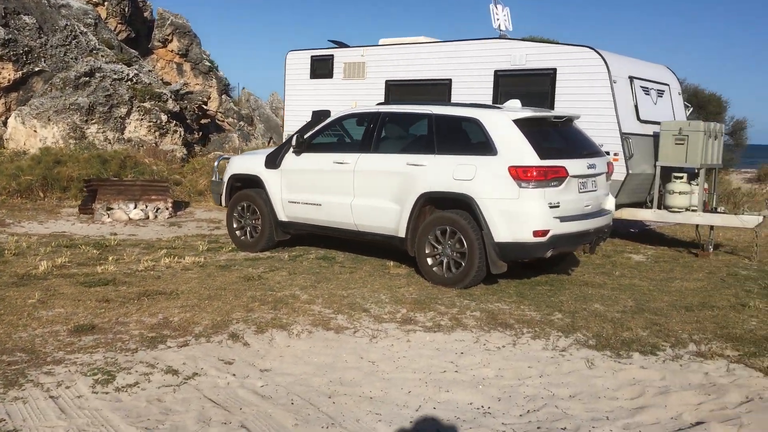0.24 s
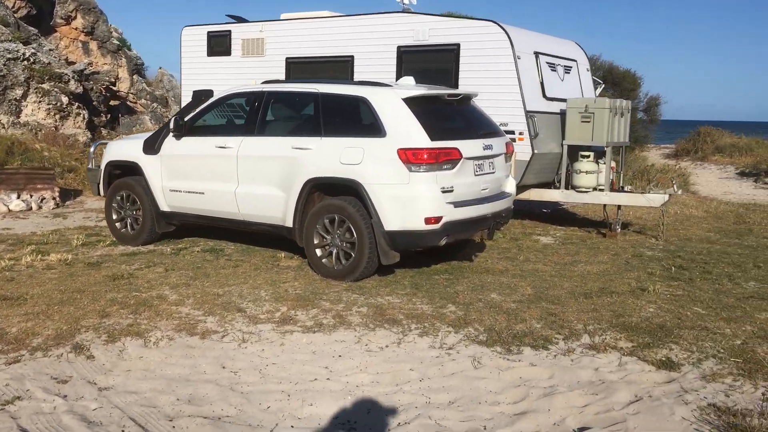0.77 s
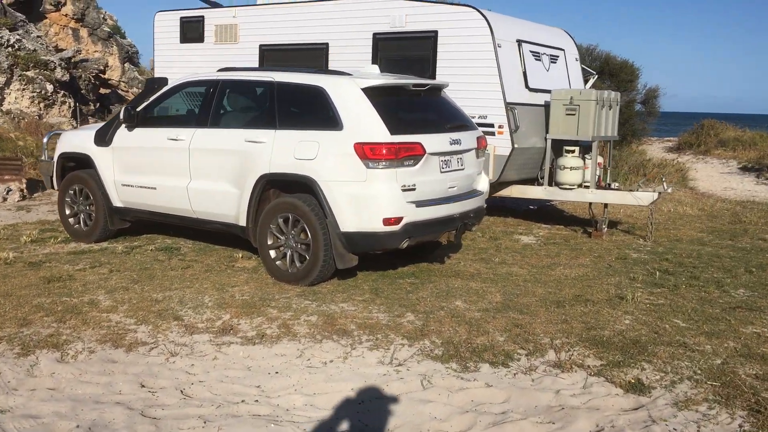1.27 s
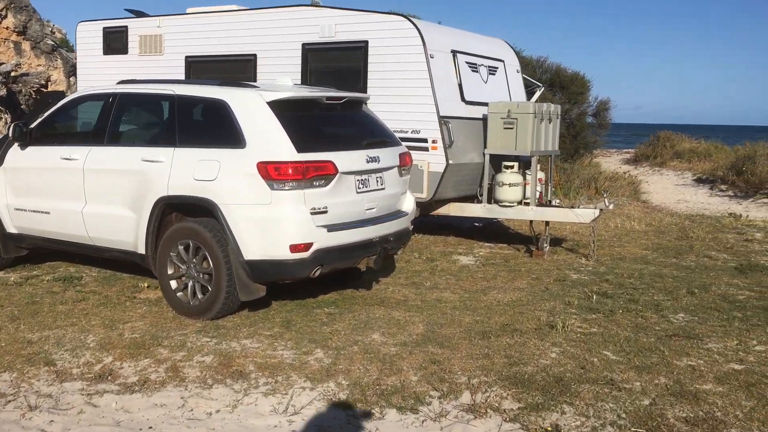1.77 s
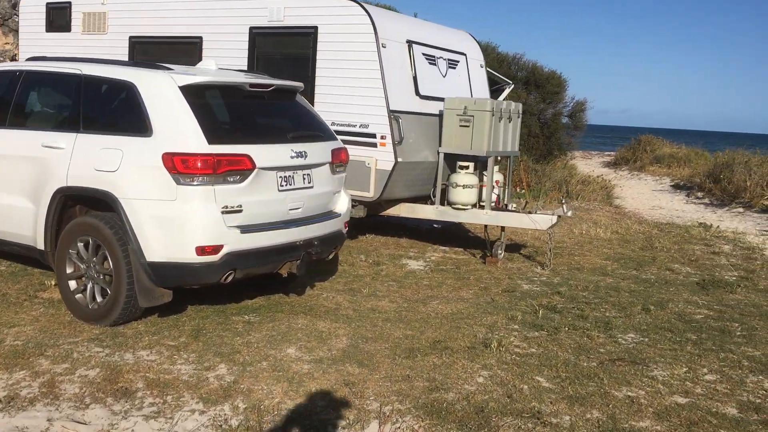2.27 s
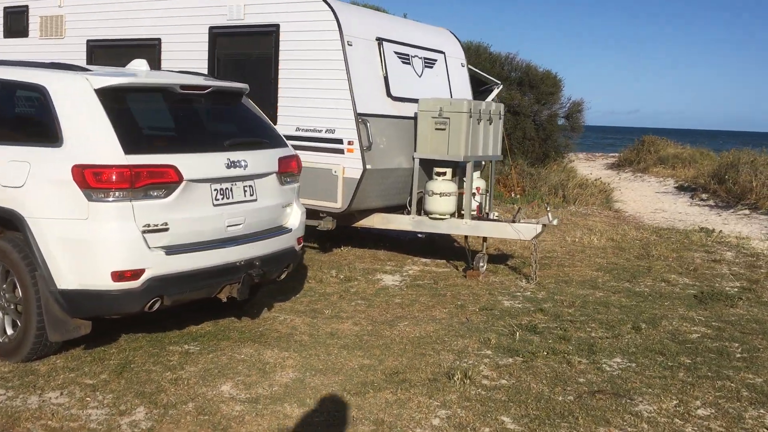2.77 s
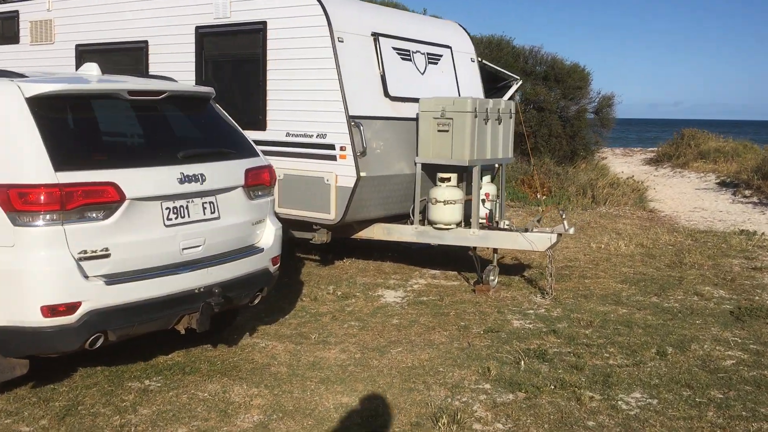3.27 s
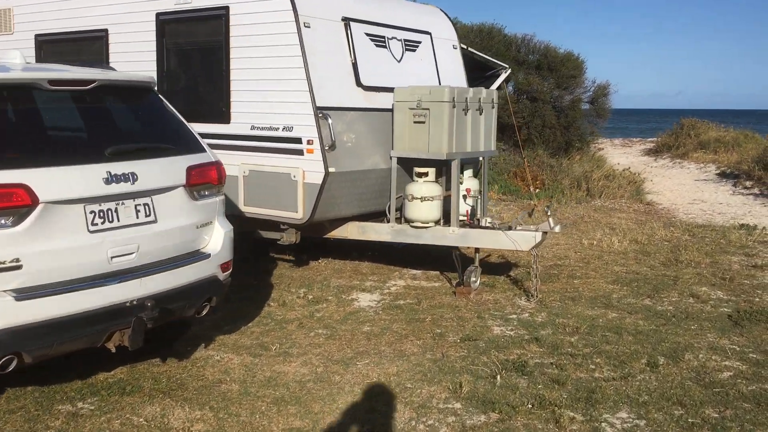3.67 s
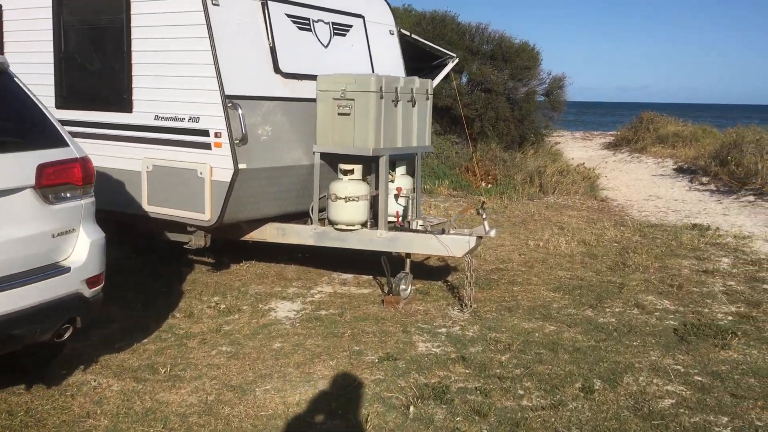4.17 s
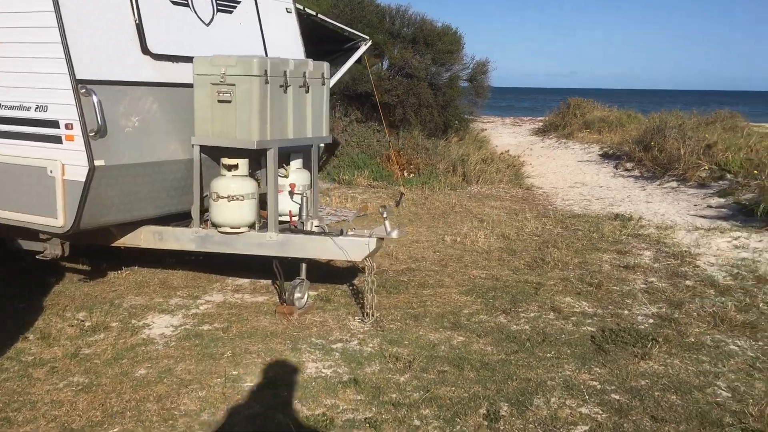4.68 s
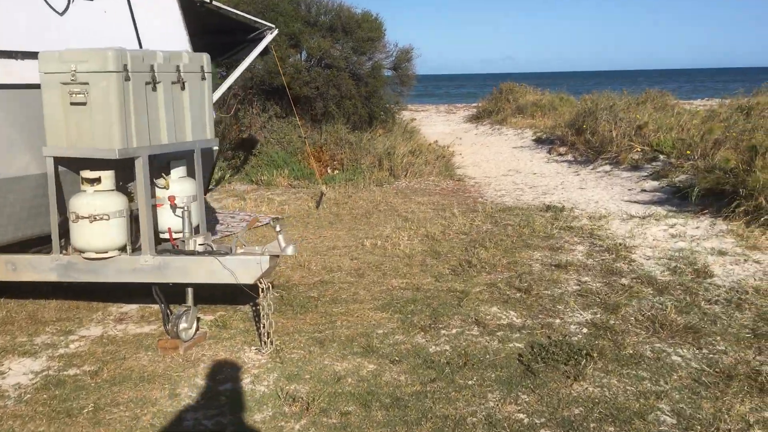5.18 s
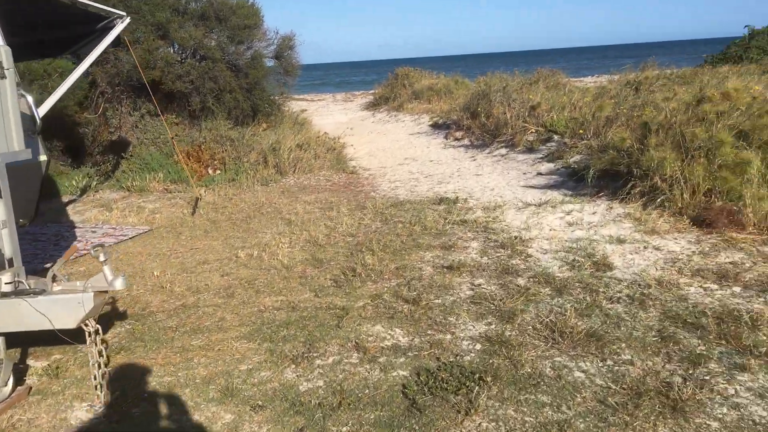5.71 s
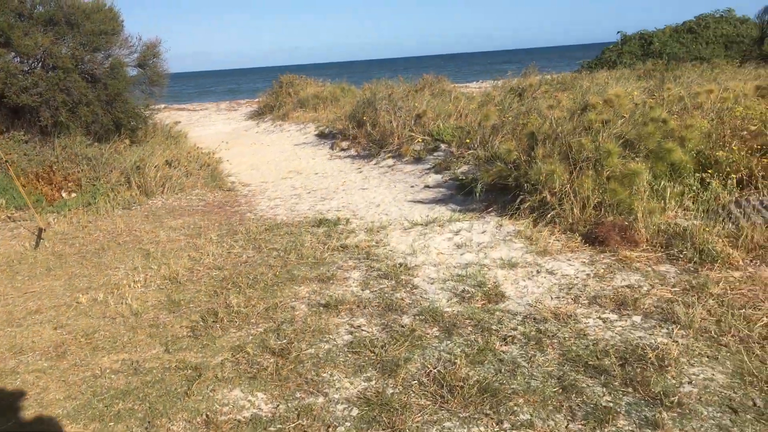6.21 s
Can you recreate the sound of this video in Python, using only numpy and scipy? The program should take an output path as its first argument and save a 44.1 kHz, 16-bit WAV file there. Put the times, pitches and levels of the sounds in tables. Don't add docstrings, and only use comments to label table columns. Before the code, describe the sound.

Strong low gusts buffet a handheld microphone outdoors, fading gradually to reveal small scuffs, grassy crunches and snapping stalks over distant sea wash.

```python
import sys
import numpy as np
from scipy import signal
from scipy.io import wavfile
from scipy.ndimage import uniform_filter1d

SR = 44100
rng = np.random.default_rng(int(sys.argv[2]) if len(sys.argv) > 2 else 0)


def convert_level_to_amplitude(level_db):
    exponent = np.asarray(level_db, float) / 20
    return 10 ** exponent


def pcm_store(signal):
    levels = np.round(np.clip(np.atleast_2d(signal), -1, 1) * 32767)
    wavfile.write(sys.argv[1], SR, levels.astype(np.int16).T)


N = 284445
T = np.arange(N) / SR
COARSE = 32

# time in seconds, roar in dB.
SURF_SWELL = [(0.0, -72.5), (0.21, -71.5), (0.45, -69), (0.6, -69.5), (0.8, -70), (1.36, -69), (1.98, -66),
              (2.91, -63), (3.27, -63), (3.86, -72.5), (4.02, -74.5), (4.89, -71), (6.29, -73),
              (6.45, -68.5)]
# frequency in Hz, density in dB per Hz.
ROAR_SPECTRUM = [(150, -0.5), (300, 1), (400, -2.5), (520, -2), (700, 0), (1000, 1), (1700, -2),
                 (2700, -14.5), (5000, -30.5), (9000, -53)]
# frequency in Hz, density in dB per Hz.
HISS_SPECTRUM = [(900, -6.5), (2000, -6), (4000, 5), (6000, -2.5), (9000, -11), (10500, -7), (12000, -16.5),
                 (15800, -32.5)]
HISS_DB, HISS_FOLLOWS = -78, 0.67

# start pitch in Hz, end pitch in Hz, level in dB.
BIRD_CHIRP = (5300, 6350, -72)
# centre in Hz, width in Hz, level in dB.
INSECT_BUZZ = (4600, 1500, -76)
CHIRP_S, BUZZ_S = (1.345, 1.375), (.11, .35)

# time in seconds, rumble in dB.
BREEZE_RUMBLE = [(0.0, -54), (0.45, -47), (0.53, -49.5), (1.22, -57.5), (1.42, -60.5), (1.6, -49.5),
                 (2.08, -55), (2.19, -65.5), (2.27, -49.5), (2.41, -59), (3.75, -56.5), (4.04, -63),
                 (4.54, -66), (4.92, -73), (5.0, -63), (5.55, -63), (5.85, -57), (6.45, -59)]
# full strength at seconds, hold in seconds, rumble in dB,
# flutter relative to it in dB.
GUSTS = [(0.002, 0.0044, -39, -23), (0.095, 0.0063, -32, -21), (0.181, 0.0083, -35, -10.5),
         (0.238, .17, -41, -1.5), (0.664, 0.027, -40, -6.5), (0.724, 0.12, -43, -20),
         (0.933, 0.044, -37, -26), (1.075, 0.07, -39, -36), (1.15, 0.017, -40.5, -7.5),
         (1.53, 0.021, -42.5, -15), (1.597, 0.053, -39.5, -39), (1.685, 0.093, -40.5, -8),
         (1.886, 0.015, -41.5, -52), (2.306, 0.01, -44, -9.5), (2.506, 0.065, -45.5, -27),
         (2.698, 0.11, -47.5, -17), (3.031, 0.087, -42.5, -9), (3.176, 0.015, -44.5, -24),
         (3.29, .02, -43.5, -23), (3.408, 0.011, -43, -26), (3.544, 0.018, -41.5, -32),
         (3.586, 0.046, -43.5, -17.5), (3.903, 0.074, -50.5, -20), (4.178, 0.16, -55.5, -37),
         (4.334, 0.016, -47.5, -2), (4.366, .11, -50, -17.5), (4.64, 0.038, -51, -19),
         (5.617, 0.13, -57, -38), (6.065, 0.026, -56, -8.5), (6.39, 0.048, -52, -22)]
# start in seconds, peak in dB, pitch in Hz,
# sharp puff relative to it in dB.
PRESSURE_BUMPS = [(0.073, -18, 64.6, -33), (0.186, -28, 141, -24), (0.271, -29, 158, -25),
                  (0.367, -28, 87, -22), (0.669, -25.5, 87.5, -46), (0.81, -32.5, 93, -26),
                  (0.922, -31.5, 58, -30), (1.161, -30, 61.9, -23.5), (1.512, -28.5, 56.6, -35.5),
                  (1.696, -30, 112, -23), (2.3, -34, 116, -52), (2.926, -36.5, 72, -33),
                  (3.041, -29, 55.7, -34), (3.28, -25.5, 81.5, -33), (3.496, -34, 80, -48),
                  (4.319, -40.5, 96, -13.5), (4.336, -36.5, 218, -17.5), (4.584, -41.5, 66, -32),
                  (4.621, -38, 57, -32), (4.962, -49, 61, -24), (5.755, -39, 65, -41),
                  (6.165, -43, 79.5, -23), (6.26, -43, 69, -31)]
GUST_RISE_DB_PER_S, GUST_FALL_DB_PER_S = 332, 265
BREEZE_BUFFET_DB, BREEZE_FLUTTER_DB = -7.5, -11
GUST_BUFFET_DB, BUFFET_FOLLOWS = -4, 0.1

# start in seconds, peak in dB, pitch in Hz, bright tick relative in dB,
# upper ring relative in dB.
STALK_SNAPS = [(0.471, -50, 2020, -31, -20), (0.8964, -48, 2630, -18, -21), (1.0616, -39, 2400, -30, -40),
               (1.3468, -51, 2230, -20, -22), (1.6316, -47.5, 1860, -30, -9.5),
               (2.4444, -33, 2090, -24, -16), (2.7422, -53, 1870, -24, -23), (2.9891, -56, 2260, -15, -10),
               (3.2799, -41, 2950, -30, -33), (3.5253, -47, 1990, -29, -11), (3.8112, -42, 2130, -32, -39),
               (4.3745, -49, 2220, -25, -27), (4.7805, -45, 1830, -28, -11),
               (4.9209, -42, 2150, -31, -12.5), (5.1657, -65, 1800, -24, -18),
               (5.4745, -55, 1860, -18, -18.5), (5.5002, -39.5, 2050, -35, -29),
               (5.515, -45.5, 1960, -20.5, -20), (5.851, -52, 3400, -19, -4), (5.883, -53.5, 3390, -20, -4),
               (6.0506, -42.5, 1990, -33.5, -28), (6.1422, -51, 1850, -29, -23),
               (6.243, -55, 2290, -8, -16), (6.291, -51, 2140, -15, -20)]
# start in seconds, peak in dB, pitch in Hz, length in seconds.
CRUSHED_CLODS = [
    (3.61, -58, 2840, 0.047),
    (4.237, -54, 2200, 0.027),
    (4.279, -55.5, 2050, 0.027),
    (4.619, -51.5, 2300, 0.035),
    (4.745, -59, 2300, .02),
    (4.826, -55, 2310, 0.022),
    (5.715, -43.5, 2100, 0.034),
    (5.746, -44, 2170, 0.036),
    (5.785, -50, 2750, 0.038),
]
# full strength at seconds, hold in seconds, spray in dB,
# crunch relative to it in dB, seconds to fade 20 dB (zero or less: at once).
SAND_CONTACTS = [(0.272, 0.078, -77, 6.5, 0), (0.37, 0.02, -78.5, 8, -0.39), (0.888, .02, -75.5, 3, .08),
                 (0.956, 0.022, -82, 4, 0.1), (1.418, .008, -82, 4, 0.2), (1.483, 0.083, -78.5, 8.5, 0.1),
                 (1.834, .01, -81, -1, 0.2), (2.016, .04, -74.5, 1, 0.23), (2.435, 0.019, -76, 5.5, .1),
                 (2.618, 0.039, -74, 5.5, -1.1), (2.96, .008, -73, -4, 0.65), (2.992, 0.011, -69, 6, -0.12),
                 (3.029, 0.011, -59.5, 8, -0.0059), (3.039, 0.044, -51.5, -0.5, -0.0352),
                 (3.104, 0.026, -83, -2, 1.8)]
GRASS_CONTACTS = [(3.612, 0.0091, -73.5, 6, 0.35), (3.7, 0.029, -80, 11, -0.4),
                  (3.972, .015, -78.5, 3, 0.6), (4.017, 0.0069, -71.5, 3, 0.07),
                  (4.094, 0.038, -81, 6, 0.8), (4.217, 0.031, -72, 5, 0.13),
                  (4.614, 0.0051, -74.5, 7, 0.47), (4.653, .05, -77, 10.5, -0.5), (4.74, 0.04, -73, 9, 0.2),
                  (4.816, 0.036, -76.5, 10, -0.27), (5.101, .01, -77.5, 3.5, 0),
                  (5.337, .055, -72.5, 6, 0.1), (5.703, 0.026, -74, 0, 0.46),
                  (5.772, 0.0048, -70.5, 11, 0.04), (5.794, .03, -68.5, 2, .12),
                  (5.877, 0.07, -75, 8.5, .13), (6.039, 0.095, -82.5, 14, -0.04),
                  (6.26, .02, -73, 5.5, -0.1), (6.29, 0.0083, -77, 10, -4.5),
                  (6.361, 0.033, -59.5, 3.5, .035), (6.414, .03, -76, -5, -2)]
STEP_RISE_DB_PER_S, STEP_SAG_DB_PER_S = 621, 55
CRUNCH_LINGERS = 1.2
CRUNCH_HZ, CRUNCH_HZ_PER_DB = 2050, 17

# centre in Hz, width in Hz, depth from 0 to 1.
BODY_NOTCH = (4890, 1350, 0.53)
# centre in Hz, width in Hz, depth from 0 to 1.
UPPER_NOTCH = (10280, 1500, 0.38)
# centre in Hz, width in Hz, boost as a fraction.
PORT_RESONANCE = (8860, 1600, 0.67)
MIC_HISS_DB = -91.5


def rms_one(x):
    return x / np.sqrt(np.mean(x ** 2) + 1e-20)


def in_time(rows):
    s, *columns = np.transpose(rows)
    return [np.interp(T, s, c) for c in columns]


def drift(rate):
    r = np.exp(-40 * np.pi * rate / SR)
    noise = rng.standard_normal(N // 20 + 2002)
    slow = signal.lfilter([1], [1, -2 * r, r * r], noise)[2000:]
    return np.interp(np.arange(N) / 20, np.arange(len(slow)), rms_one(slow))


def band(x, low_hz, high_hz, order=2):
    edges_hz = [low_hz, min(high_hz, .45 * SR)]
    return signal.sosfilt(signal.butter(order, edges_hz, "band", fs=SR, output="sos"), x)


def resonance(x, hz, width_hz):
    r = np.exp(-np.pi * width_hz / SR)
    zeros = np.array([1, 0, -1]) * (1 - r * r) / 2
    return signal.lfilter(zeros, [1, -2 * r * np.cos(2 * np.pi * hz / SR), r * r], x)


def steep(x, hz, width_hz):
    return resonance(resonance(x, hz, width_hz), hz, width_hz)


def grains(per_s, spread_db):
    draw = rng.random((2, N))
    out, born = np.zeros(N), np.flatnonzero(draw[0] < per_s / SR)
    chance = 2 * draw[1, born] - 1
    size = np.minimum(-np.log(np.abs(chance) + 1e-9), 4)
    out[born] = np.sign(chance) * convert_level_to_amplitude(spread_db * size)
    return rms_one(out)


def envelope_db(s, hold, peak_db, rise_db_per_s, fall_db_per_s, sag_db_per_s=0):
    t = T[::COARSE] - s
    rise = rise_db_per_s * np.clip(-t, 0, 1)
    sag = sag_db_per_s * np.clip(t, 0, hold)
    return peak_db - rise - sag - fall_db_per_s * np.clip(t - hold, 0, 1)


def rounded(coarse_db):
    return np.interp(T, T[::COARSE], uniform_filter1d(coarse_db, size=11))


def banded_noise(spectrum, patchy_db):
    out, edges = 0, 125 * 2 ** np.arange(0, 7.1, 1 / 3)
    white = rng.standard_normal((2, N))
    hz, level_db = np.transpose(spectrum)
    for k, (low, high) in enumerate(zip(edges, edges[1:])):
        centre_db = np.interp(np.log(low * high) / 2, np.log(hz), level_db)
        out = out + convert_level_to_amplitude(centre_db + patchy_db * drift(8.9)) * band(white[k % 2], low, high)
    return rms_one(out)


def surf():
    roar_db, = in_time(SURF_SWELL)
    hiss_db = HISS_DB + HISS_FOLLOWS * (roar_db + 69)
    roar = convert_level_to_amplitude(roar_db + 1.0) * banded_noise(ROAR_SPECTRUM, patchy_db=1.5)
    return roar + convert_level_to_amplitude(hiss_db + 1.5) * banded_noise(HISS_SPECTRUM, patchy_db=0.73)


def wildlife():
    share, swell = (np.clip((T - start) / (end - start), 0, 1) for start, end in (CHIRP_S, BUZZ_S))
    from_hz, to_hz, chirp_db = BIRD_CHIRP
    phase = 2 * np.pi * np.cumsum(from_hz + (to_hz - from_hz) * share) / SR
    chirp = np.sin(np.pi * share) * np.sin(phase) * convert_level_to_amplitude(3.1 * drift(150))
    hz, width_hz, buzz_db = INSECT_BUZZ
    buzz = rms_one(steep(rng.standard_normal(N), hz, width_hz))
    buzz = np.sqrt(np.sin(np.pi * swell) + 1e-12) * buzz
    return convert_level_to_amplitude(chirp_db) * chirp + convert_level_to_amplitude(buzz_db) * buzz


def eddies(low_hz, high_hz, lump_db):
    swirl = rms_one(band(rng.standard_normal(N + 4000), low_hz, high_hz)[4000:])
    size = np.sqrt(uniform_filter1d(swirl ** 2, size=int(SR / low_hz)) + 1e-9)
    return rms_one(swirl / (1 + 0.1 * size) * convert_level_to_amplitude(lump_db))


def push_bumps(out):
    puffs = eddies(203, 402, 0)
    for s, peak_db, hz, puff_db in PRESSURE_BUMPS:
        cycles = np.arange(int(5 / hz * SR)) / SR * hz
        shape = (cycles / 0.6 * np.exp(1 - cycles / 0.59)) ** 2
        span = slice(int(s * SR), int(s * SR) + len(cycles))
        out[span] *= 1 - .9 * np.sqrt(shape)
        out[span] += convert_level_to_amplitude(peak_db - 2.0) * shape * np.sin(2 * np.pi * cycles)
        edge = slice(span.start - 200, span.start + 900)
        out[edge] += convert_level_to_amplitude(peak_db + puff_db + 2) * np.hanning(edge.stop - edge.start) * puffs[edge]
    return out


def wind():
    rumble_db = in_time(BREEZE_RUMBLE)[0][::COARSE]
    buffet_db, flutter_db = rumble_db + BREEZE_BUFFET_DB, rumble_db + BREEZE_FLUTTER_DB
    for s, hold, peak_db, sharp_db in GUSTS:
        gust_db = envelope_db(s, hold, peak_db, GUST_RISE_DB_PER_S, GUST_FALL_DB_PER_S)
        rumble_db = np.maximum(rumble_db, gust_db)
        buffet_db = np.maximum(buffet_db, gust_db + GUST_BUFFET_DB + BUFFET_FOLLOWS * sharp_db)
        flutter_db = np.maximum(flutter_db, gust_db + sharp_db)
    rumble_db, buffet_db, flutter_db = map(rounded, (rumble_db, buffet_db, flutter_db))
    lumps = np.tanh(drift(24))
    out = convert_level_to_amplitude(rumble_db) * eddies(38.7, 78.3, 3.1 * lumps)
    out += convert_level_to_amplitude(buffet_db - 0.5) * eddies(92.8, 140.2, 3.6 * lumps + 4.9 * drift(22))
    out += convert_level_to_amplitude(flutter_db - 3.0) * eddies(160, 265, 4.0 * lumps + 1.5 * drift(30))
    return push_bumps(out)


def peak_one(x):
    return x / np.abs(x).max()


def snaps():
    out, splinters = np.zeros(N), rng.standard_normal((len(STALK_SNAPS), 600)) ** 3
    fading = np.exp(-np.arange(600) / SR / .002)
    for (s, peak_db, hz, top_db, upper_db), after in zip(STALK_SNAPS, splinters):
        click = signal.unit_impulse(len(after)) + .025 * after * fading
        body = band(click, 900, 3700, order=4) + 1.5 * steep(click, hz, 900)
        sound = peak_one(body)
        sound += convert_level_to_amplitude(upper_db + 3) * peak_one(steep(click, 3500, 700))
        sound += convert_level_to_amplitude(top_db + 7.5) * peak_one(steep(click, 8600, 4000))
        at = int(s * SR)
        out[at:at + len(click)] += convert_level_to_amplitude(peak_db - 4.5) * sound
    return out


def clods():
    grit, out = grains(per_s=2900, spread_db=-1.5), np.zeros(N)
    for s, peak_db, hz, length in CRUSHED_CLODS:
        at, size = int(s * SR), int(np.clip(length, .008, .05) * SR)
        ring = rms_one(steep(grit[at:at + size], hz, 760))
        out[at:at + size] += convert_level_to_amplitude(peak_db - 10.0) * np.sqrt(np.hanning(size)) * ring
    return out


def footsteps():
    spray_db, crunch_db = np.full((2, len(T[::COARSE])), -120.)
    for s, hold, peak_db, relative_db, fade_s in SAND_CONTACTS + GRASS_CONTACTS:
        fall = 20 / max(fade_s, .005)
        scuff_db = envelope_db(s, hold, peak_db, STEP_RISE_DB_PER_S, fall, STEP_SAG_DB_PER_S)
        clump_db = envelope_db(s, hold, peak_db + relative_db, STEP_RISE_DB_PER_S,
                               fall / CRUNCH_LINGERS, STEP_SAG_DB_PER_S)
        spray_db = np.maximum(spray_db, scuff_db)
        crunch_db = np.maximum(crunch_db, clump_db)
    spray_db, crunch_db = rounded(spray_db), rounded(crunch_db)
    spray_gain = convert_level_to_amplitude(spray_db)

    fine = grains(per_s=14000 * convert_level_to_amplitude(1.2 * drift(42)), spread_db=5.0)
    spray = rms_one(band(fine, 6230, 10760, order=3))
    spray = spray + convert_level_to_amplitude(-18) * rms_one(band(fine, 13000, 18000))

    centre_hz = np.clip(CRUNCH_HZ + CRUNCH_HZ_PER_DB * (spray_db + 79), 1700, 3500)
    crunch, clumps = np.zeros(N), convert_level_to_amplitude(0.91 * drift(60))
    excess_db = crunch_db - 20 * np.log10(spray_gain + 1e-9)
    focus = 3.0 + 0.69 * np.clip(excess_db, 0, 20)
    for hz in np.geomspace(480, 4700, 14):
        nearness_db = -focus * np.log2(hz / centre_hz) ** 2 + 2.0 * drift(21)
        ring = steep(grains(per_s=1100 * clumps, spread_db=2.0), hz, 0.31 * hz)
        crunch += rms_one(ring) * convert_level_to_amplitude(nearness_db)
    return spray_gain * spray * convert_level_to_amplitude(-1.0) + convert_level_to_amplitude(crunch_db - 6.0) * crunch * clumps


def scene():
    air = surf() + snaps() + clods() + footsteps()
    for hz, width_hz, depth in (UPPER_NOTCH, BODY_NOTCH):
        air = air - depth * resonance(air, hz, width_hz)
    hz, width_hz, boost = PORT_RESONANCE
    air = air + boost * resonance(air, hz, width_hz)
    return (air + wildlife() + wind())[None]


def low_pass(x):
    return signal.sosfilt(signal.butter(12, 15900, fs=SR, output="sos"), x)


def record(dry):
    x = dry + convert_level_to_amplitude(MIC_HISS_DB) * rms_one(band(rng.standard_normal(N), 9500, 17000))
    x = signal.sosfilt(signal.butter(2, 30, "high", fs=SR, output="sos"), x)
    return low_pass(x)


dry = scene()
out = record(dry)
pcm_store(out)
```